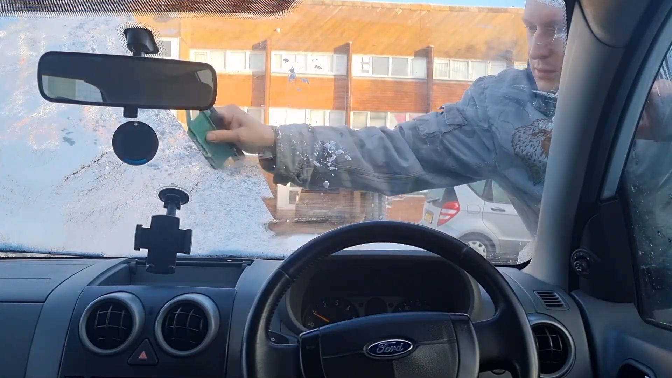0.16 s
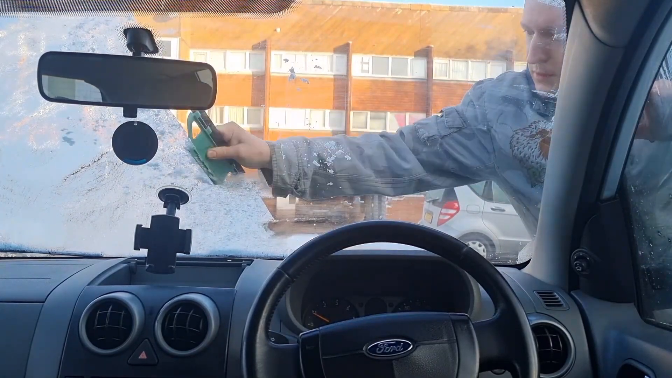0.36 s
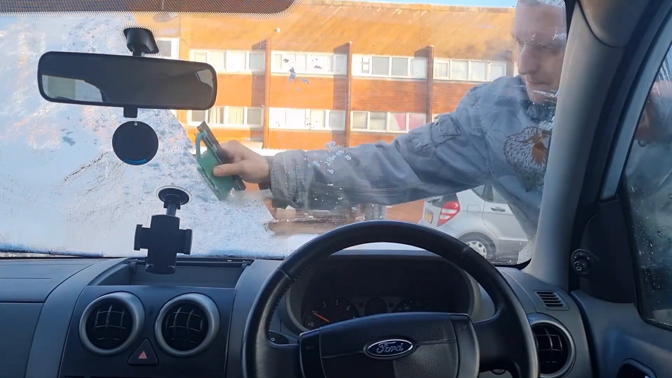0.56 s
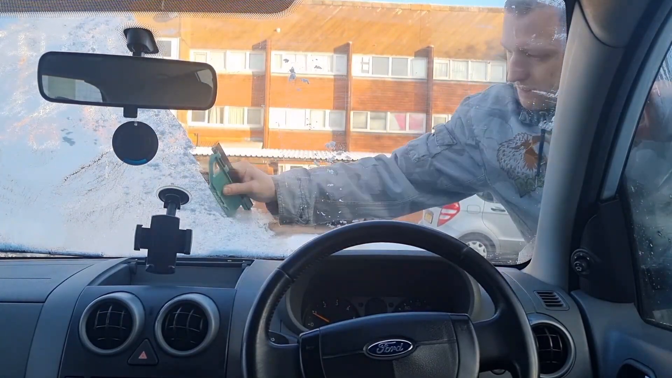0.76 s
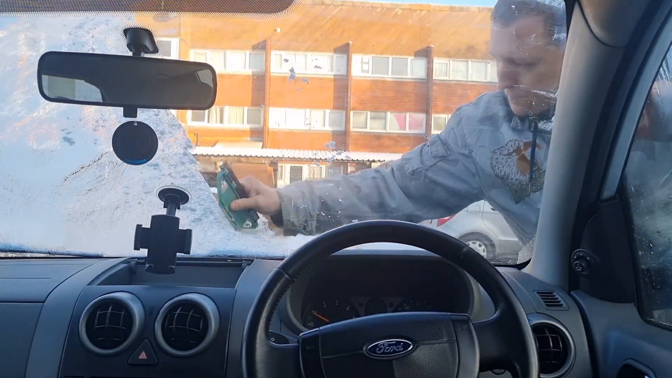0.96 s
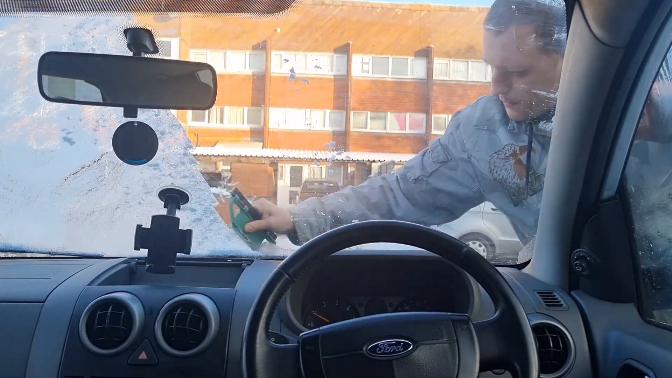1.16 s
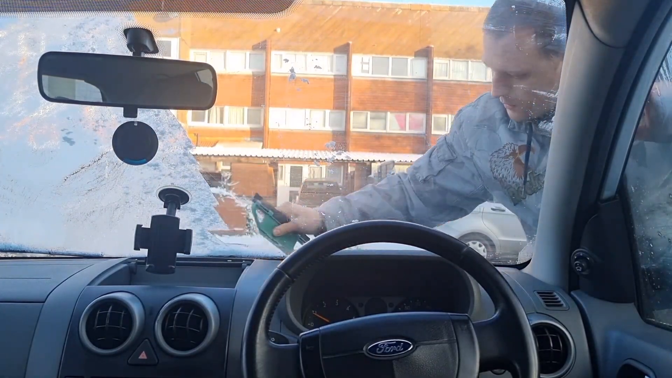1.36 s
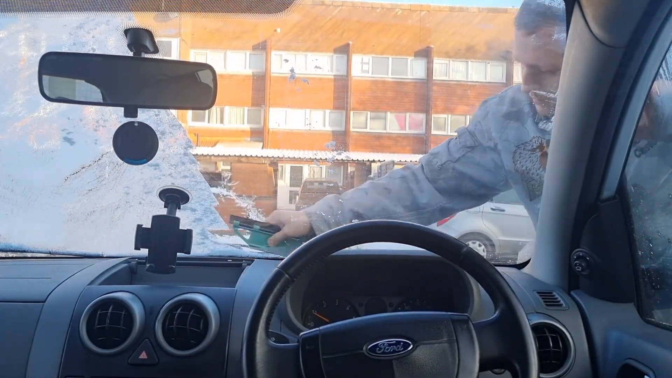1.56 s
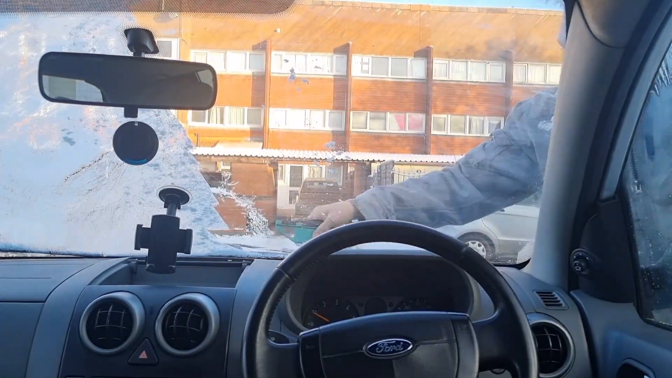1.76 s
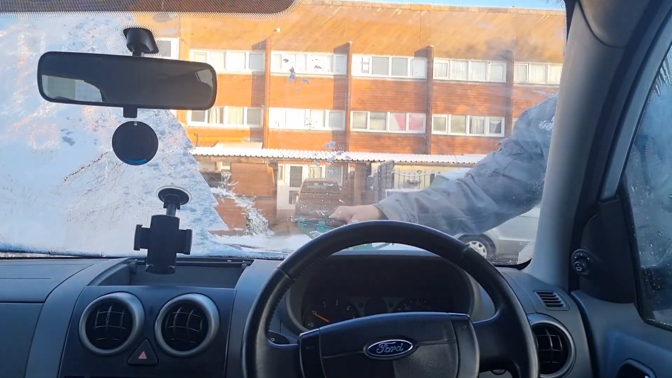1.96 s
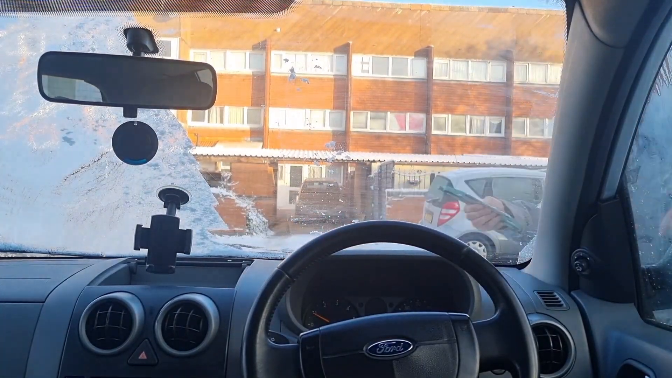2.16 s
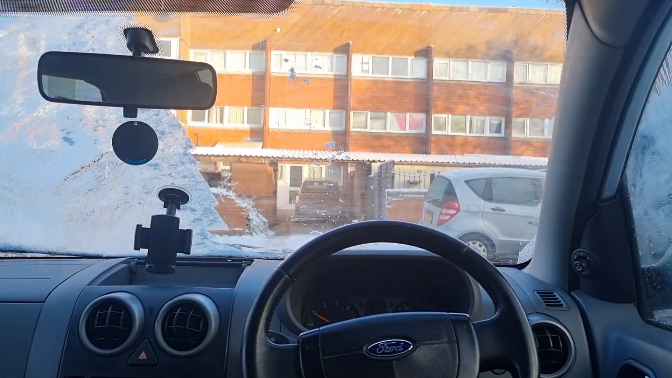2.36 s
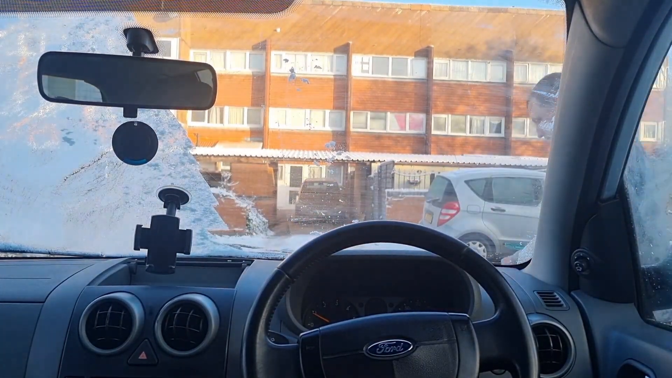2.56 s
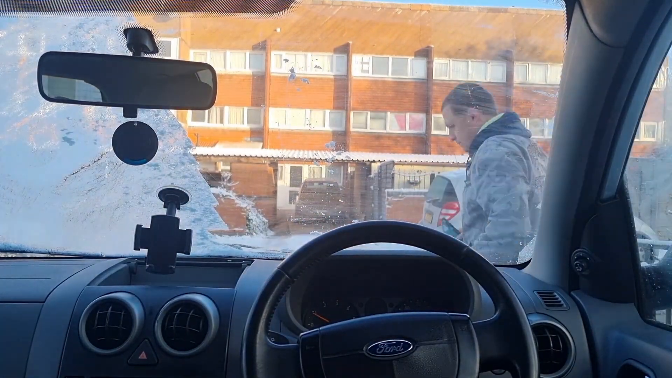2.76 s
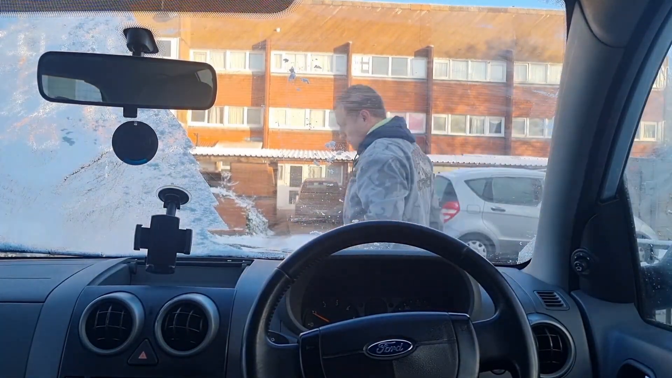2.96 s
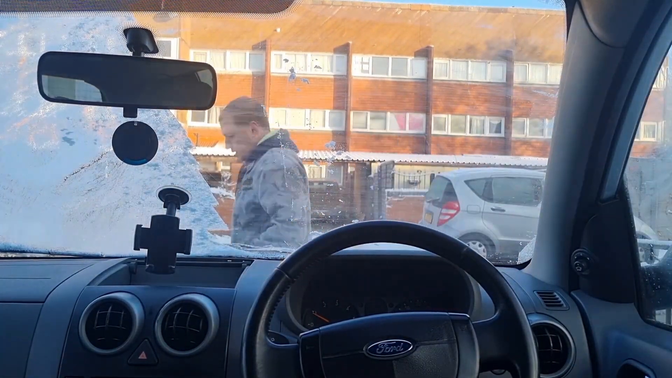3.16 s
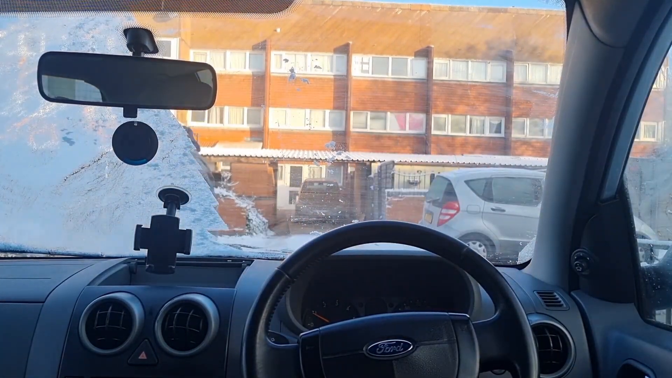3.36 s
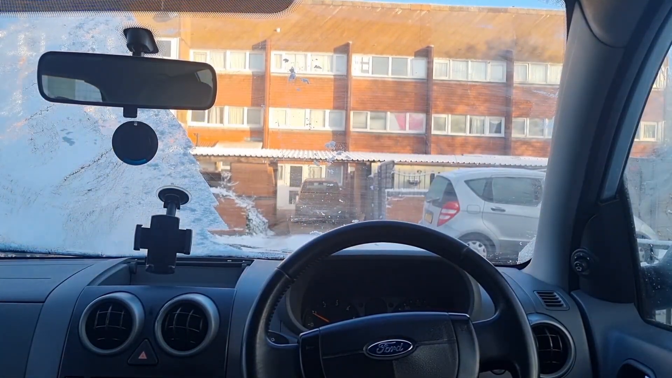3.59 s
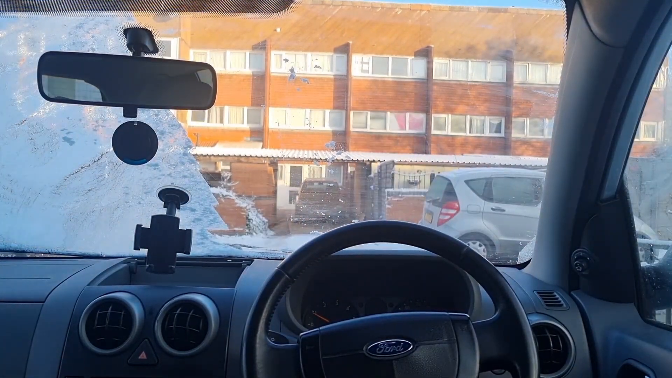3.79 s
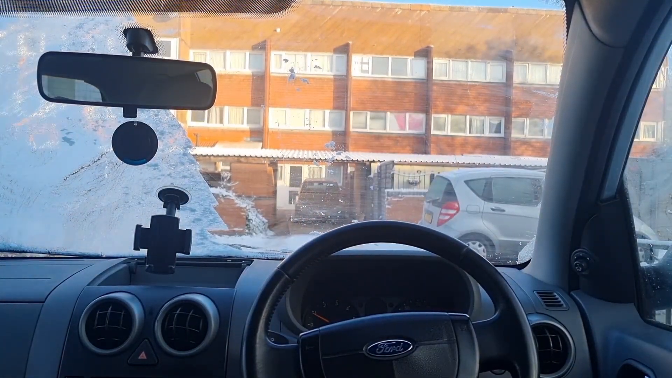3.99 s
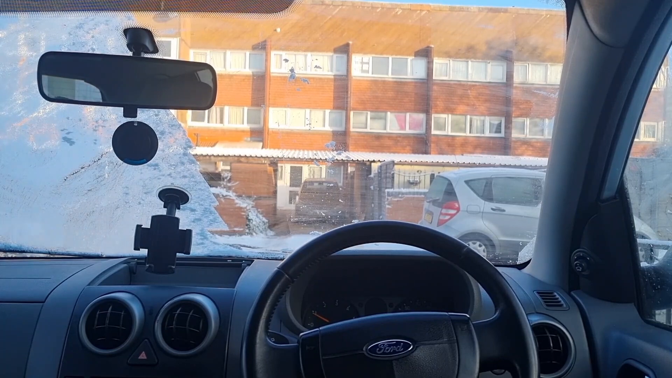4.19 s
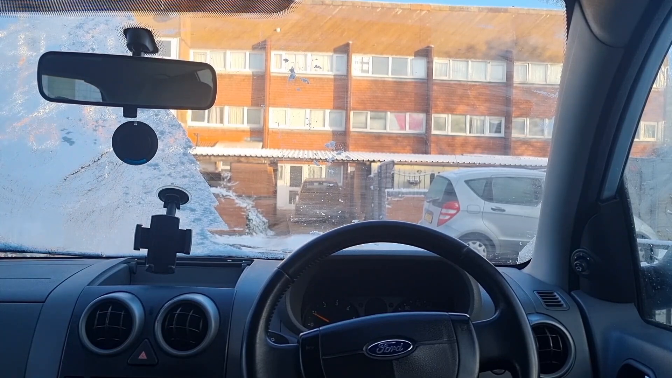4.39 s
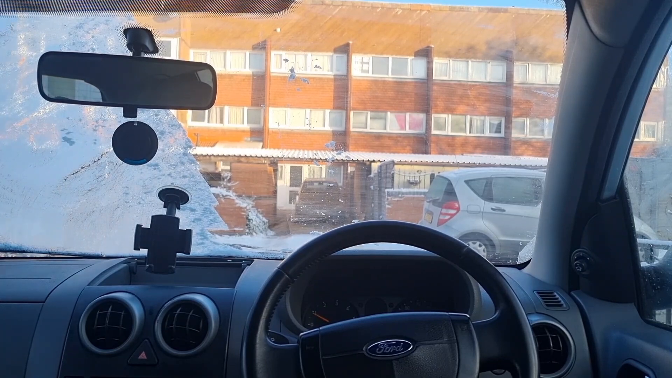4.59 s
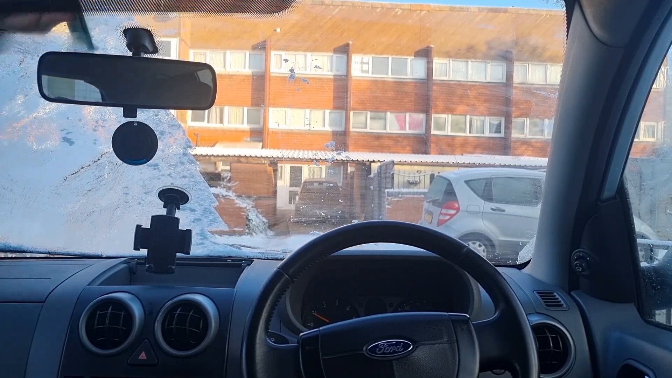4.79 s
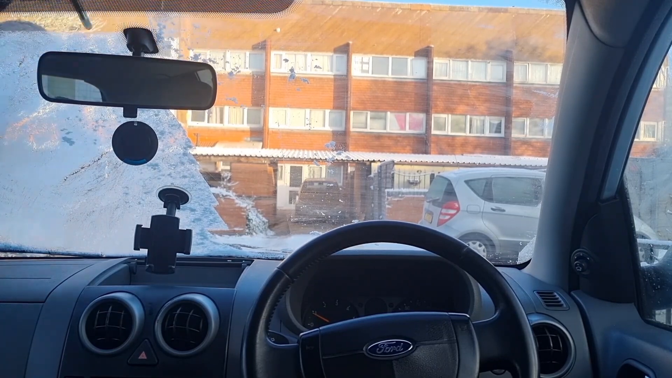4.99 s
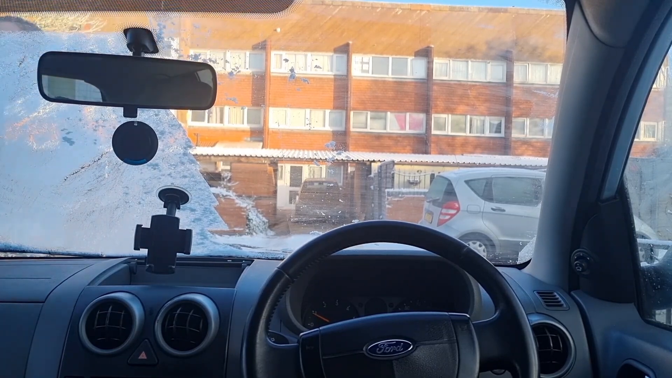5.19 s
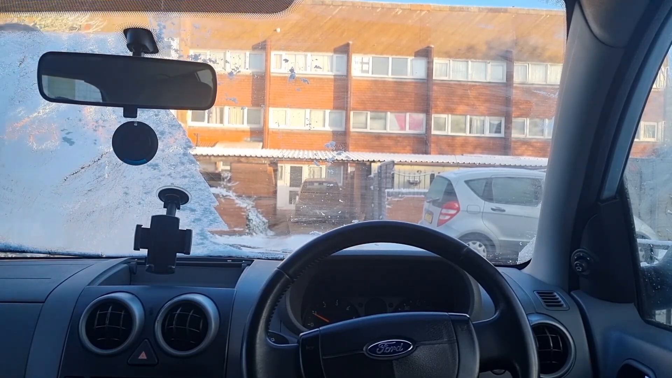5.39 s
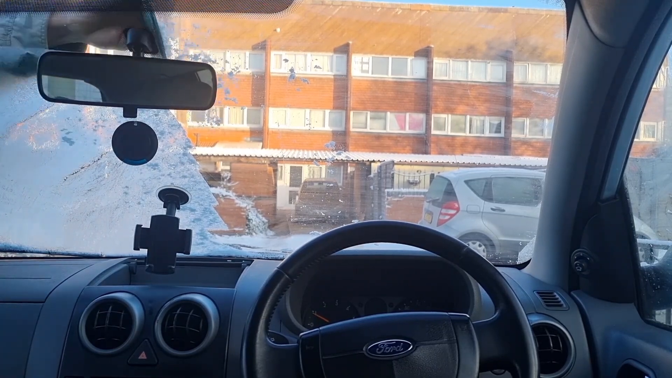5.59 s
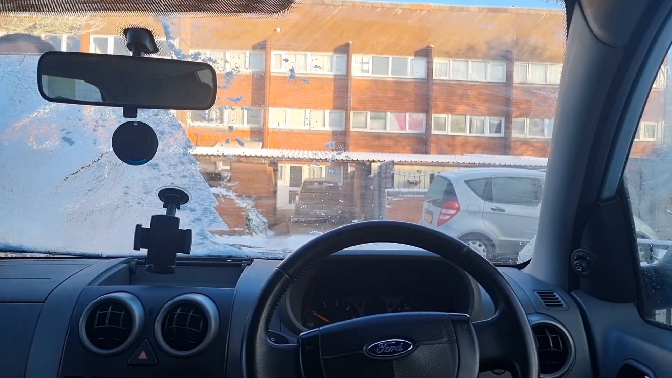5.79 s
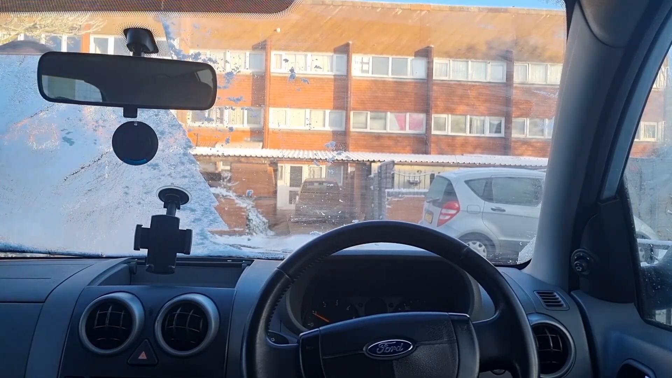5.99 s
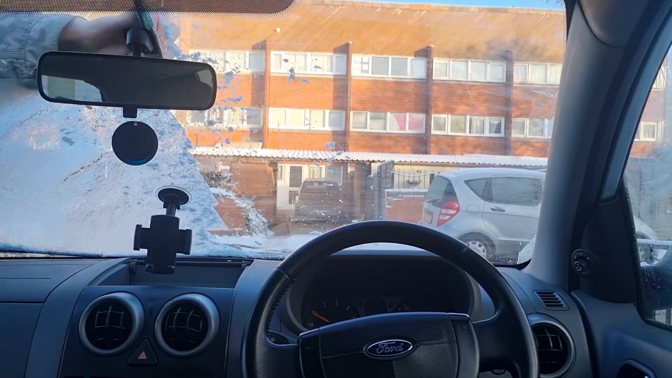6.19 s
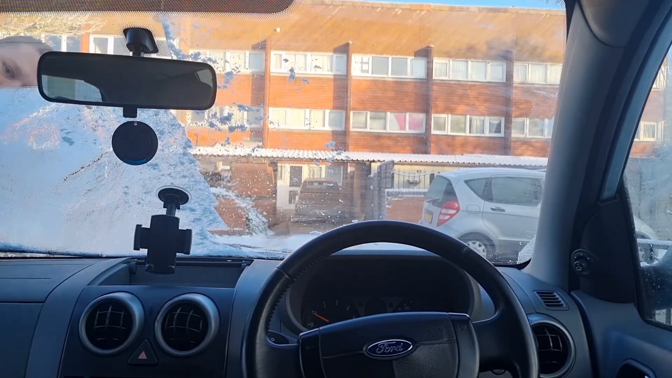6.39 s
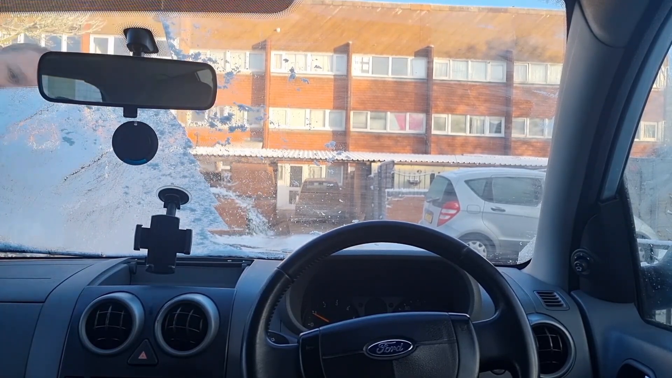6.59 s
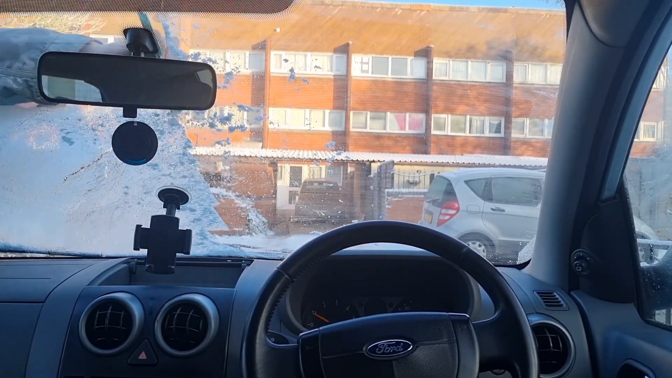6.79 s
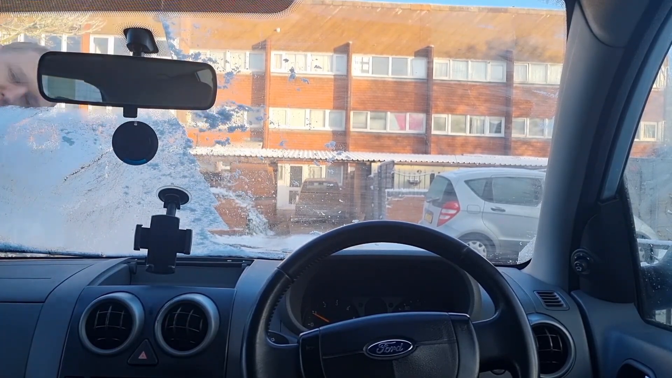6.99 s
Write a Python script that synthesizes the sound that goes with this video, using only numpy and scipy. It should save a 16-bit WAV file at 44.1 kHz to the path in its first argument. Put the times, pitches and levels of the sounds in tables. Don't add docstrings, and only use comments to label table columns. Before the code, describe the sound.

Inside a parked car, a low engine idle hums and wavers throughout, with soft cabin rumble and barely audible hiss. From 0 to 1.6 s a plastic blade scrapes windscreen frost in eight quick cycles, about five a second: strong gritty push, weaker pull, softer around 0.4 to 0.7 s, firm again after. Small ice snaps and low body thuds are mixed in. From 1.6 to 2.3 s come irregular short flicks, with a clustered knock at 2.13 s. Then only the hum until a faint tap at 4.4 s and a clearer set-down at 4.5 s. A slow, dull push runs 4.65 to 5.15 s, with an ice crack near 4.95. Pulls with a deep thud and squeaks follow at 5.2 to 5.5 s, then longer, brighter pushes at 5.6, 6.2 and 6.8 s alternate with rising pulls. A sharp crack and knock land at 5.7 s; the strong last push ends around 7 s.

```python
import sys
import numpy as np
from scipy import signal
from scipy.fft import rfft, irfft, next_fast_len
from scipy.io import wavfile
from scipy.ndimage import uniform_filter1d, map_coordinates

SR = 44100
rng = np.random.default_rng(int(sys.argv[2]) if len(sys.argv) > 2 else 0)


def linear_from_db(decibels):
    return 10 ** (np.asarray(decibels, float) / 20)


def to_wav(sig):
    pcm = np.clip(np.atleast_2d(sig), -1, 1) * 32767
    pcm = np.round(pcm).astype(np.int16)
    wavfile.write(sys.argv[1], SR, pcm.T)


N = 310905

# frequency in Hz, density in dB per Hz.
DRONE_SPECTRUM = [(300, -11), (550, -7.5), (730, 0), (900, -7), (1200, -3.5), (1400, -5), (1600, -9),
                  (1900, -16)]
FROST_SPECTRUM = [(1300, -31), (1750, -7.5), (2050, -5.5), (2300, -1.5), (2480, -2), (2700, -1.5),
                  (2950, -2.5), (3200, -3), (3500, -4.5), (3780, -7), (4600, -12), (6000, -23)]
CRISP_SPECTRUM = [(2800, -28), (3900, -2.5), (5500, -2.5), (7500, -10), (9000, -22), (10000, -41)]
FIZZ_SPECTRUM = [(6500, -37.5), (8800, -4.5), (10500, -4.5), (13300, -3.5), (15800, -4)]

# push start in s, push end in s, pull end in s, push level in dB, pull level in dB.
QUICK_CYCLES = [
    (0.039, 0.095, 0.17, -36.5, -44),
    (0.213, 0.267, 0.34, -38, -47),
    (0.389, 0.455, 0.52, -41, -48.5),
    (0.583, 0.649, 0.72, -40.5, -45.5),
    (0.776, 0.842, 0.92, -36, -41.5),
    (0.981, 1.047, 1.132, -35, -46.5),
    (1.195, 1.271, 1.335, -36.5, -42.5),
    (1.42, 1.495, 1.588, -35.5, -47.5),
]
# start in s, end in s, level in dB, fizz relative level in dB.
SINGLE_STROKES = [(1.641, 1.726, -41.5, -20), (1.744, 1.82, -55, -25), (1.822, 1.902, -45.5, -23.5),
                  (1.922, 1.963, -50, -25), (2.023, 2.051, -38, -19.5), (2.095, 2.13, -48, -19),
                  (2.149, 2.19, -53, -18.5), (2.234, 2.269, -41, -19), (2.297, 2.314, -55.5, -17),
                  (5.22, 5.408, -43.5, -22.5), (5.403, 5.497, -48, -21), (5.507, 5.545, -38, -23),
                  (5.947, 6.192, -43.5, -18.5), (6.546, 6.798, -40, -19)]
# start in s, end in s, level in dB, fizz relative level in dB.
IDLE_TOUCHES = [
    (4.408, 4.422, -69, -49),
    (4.499, 4.537, -47, -36.5),
    (4.55, 4.596, -61, -36),
    (5.13, 5.209, -57.5, -24),
]
# start in s, dig-in in s, end in s, level once dug in in dB, fizz relative level in dB.
LONG_PUSHES = [
    (4.644, 4.86, 5.15, -39.5, -22),
    (5.56, 5.664, 5.871, -39.5, -15.5),
    (6.202, 6.294, 6.472, -36, -18),
    (6.82, 6.892, 7.059, -35, -17),
]

# time in s, peak level in dB, centre frequency in Hz.
JAMS = [
    (0.051, -31, 2620),
    (.81, -40, 3400),
    (1.015, -34.5, 2970),
    (1.46, -40, 2800),
    (2.043, -44, 2900),
    (6.317, -33.5, 2280),
    (6.916, -33, 3280),
]
SNAPS = [(0.238, -33.5, 1860), (1.248, -38.5, 900), (1.255, -38, 350), (2.13, -39.5, 900),
         (4.885, -39, 1500), (4.951, -32.5, 1500), (5.285, -43, 2180), (5.349, -40, 1810),
         (5.385, -42, 1420), (5.696, -30.5, 2490), (6.32, -37, 3680), (6.327, -35.5, 503)]
SQUEAKS = [
    (5.235, -47, 1100),
    (5.286, -37.5, 1170),
    (5.607, -40.5, 2200),
    (6.081, -42, 727),
    (6.398, -43, 1280),
    (6.75, -42, 1320),
    (6.863, -54, 1260),
    (.893, -49, 740),
]
KNOCKS = [
    (2.126, -31, 392),
    (2.134, -29.5, 407),
    (2.134, -31, 648),
    (2.141, -31.5, 221),
    (2.165, -41.5, 300),
    (4.5, -37.5, 745),
    (5.697, -32.5, 1030),
    (5.704, -34.5, 560),
    (5.708, -32.5, 196),
]
THUDS = [
    (0.261, -31, 90.5),
    (.57, -39.5, 168),
    (0.97, -38.5, 168),
    (1.05, -37, 105),
    (1.273, -36, 110),
    (1.5, -35.5, 105),
    (2.25, -40, 166),
    (5.236, -31, 67),
    (5.39, -36.5, 167),
]

# multiple of firing rate, rms level in dB, wander in Hz, flutter in dB.
ENGINE_ORDERS = [(1.014, -41, 0.71, 1.2), (2.12, -34.5, 2.216, 0.96), (3.97, -55.5, 3, 4),
                 (5.03, -60, 2.87, 2), (5.92, -56, 2.994, 3.5), (7.91, -52, 3.935, 3),
                 (11.86, -51, 4.99, 3), (64.9, -72.5, 15, 5.5)]
# frequency in Hz, density in dB per Hz.
CABIN_SPECTRUM = [(3, -21.5), (40, -16), (65, -5.5), (95, -17), (200, -18.5), (260, -25), (345, -20.5),
                  (400, -23.5), (650, -30), (1340, -44), (1900, -44.5), (2680, -58.5), (3150, -53),
                  (4050, -60.5), (4400, -76)]
# frequency in Hz, density in dB per Hz.
HISS_SPECTRUM = [(3000, -19), (4800, 0), (7000, -15.5), (10000, -17), (13000, -14.5), (16500, -21.5)]
# frequency in Hz, left minus right in dB.
LEAN_DB = [(60, 1), (200, -4.5), (400, 0), (1300, -0.5), (2400, 2), (4400, -1.5), (15000, 1.5)]

TURN_S = 0.02
PUSH_GAINS_DB, PULL_GAINS_DB, PUSH_FIZZ_DB, PULL_FIZZ_DB = 2, 7, -19.5, -17.5
SINGLE_GAINS_DB, TOUCH_GAINS_DB = 4.5, -6.5
RUN_UP_DB, RUN_UP_GAINS_DB, RUN_UP_DULLER_DB = -3, 9, -4.5
REACH_S, FADE_DB_PER_S = 0.13, -50
DRONE_DB, DRONE_PER_FIZZ = -5.5, -0.4
FIRING_HZ = 28.65
TOP_HZ = 15800


def unit(x):
    return x / np.sqrt(np.mean(x ** 2, axis=-1, keepdims=True) + 1e-20)


def along(points, hz):
    f, v = np.transpose(points)
    return np.interp(np.log(hz + 1), np.log(f + 1), v, left=-120, right=-120)


def wobble(rate_hz):
    at = np.arange(0, N + 8, 8)
    knots = rng.standard_normal(int(N * rate_hz / SR) + 4)
    return np.interp(np.arange(N), at, map_coordinates(knots, [at * rate_hz / SR]))


def filtered(x, response):
    m = next_fast_len(x.shape[-1] + 8192)
    spectrum = rfft(x, m) * response(np.fft.rfftfreq(m, 1 / SR))
    return irfft(spectrum, m)[..., :x.shape[-1]]


def patchy(x, patchy_db, wide, long, size=256):
    z = signal.stft(x, nperseg=size)[2]
    field = rng.standard_normal(z.shape[1:])
    field = uniform_filter1d(field, int(wide), axis=0)
    field = uniform_filter1d(field, int(long), axis=1)
    return signal.istft(z * linear_from_db(patchy_db * field / field.std()), nperseg=size)[1][:, :N]


def scraper():
    fizz_db = np.transpose(strokes())[-1]
    drone_db = DRONE_DB + DRONE_PER_FIZZ * (fizz_db + 20)
    crisp_db = -6.0 + 0.5 * (fizz_db + 19.0)
    bite_db = 0.55 * wobble(28) + 0.8 * wobble(110)
    drone = under_strokes(drone_db + 0.11, 0.0055, 0.01, late_s=0.0011, linger_db=-30)
    frost = under_strokes(0 * fizz_db - 1.5, 0.0045, 0.005, late_s=0.0005, linger_db=-18)
    crisp = under_strokes(crisp_db, 0.0022, 0.005, late_s=0.002, linger_db=-38)
    fizz = under_strokes(fizz_db + 0.3, 0.0012, 0.004, late_s=0.0035, linger_db=-52)
    return (drone * linear_from_db(1.2 * bite_db) * grit(DRONE_SPECTRUM, 0.57, patchy_db=1.5, modes_db=4.5)
            + frost * linear_from_db(bite_db) * grit(FROST_SPECTRUM, 0.77, patchy_db=1.6, modes_db=3.5)
            + crisp * linear_from_db(1.1 * bite_db) * grit(CRISP_SPECTRUM, 0.88, patchy_db=2.6, modes_db=2.5)
            + fizz * linear_from_db(0.56 * bite_db) * grit(FIZZ_SPECTRUM, 1.1, patchy_db=2.0, modes_db=-0.5))


def strokes():
    rows = [(start, end, db, SINGLE_GAINS_DB, fizz) for start, end, db, fizz in SINGLE_STROKES]
    rows += [(start, end, db, TOUCH_GAINS_DB, fizz) for start, end, db, fizz in IDLE_TOUCHES]
    for start, turn, end, push_db, pull_db in QUICK_CYCLES:
        rows.append((start, turn, push_db, PUSH_GAINS_DB, PUSH_FIZZ_DB))
        rows.append((turn + TURN_S, end, pull_db, PULL_GAINS_DB, PULL_FIZZ_DB))
    for start, dig, end, db, fizz in LONG_PUSHES:
        rows.append((start, dig, db + RUN_UP_DB, RUN_UP_GAINS_DB, fizz + RUN_UP_DULLER_DB))
        rows.append((dig, end, db, FADE_DB_PER_S * (end - dig - REACH_S), fizz))
    return sorted(rows)


def under_strokes(column_db, rise_s, fall_s, late_s, linger_db):
    power, t, rest = np.zeros(N), np.arange(N) / SR, -1
    step = lambda x, edge_s: 1 / (1 + np.exp(-x / edge_s))
    for (start, end, db, gain_db, _), rel_db in zip(strokes(), column_db):
        near = slice(max(int((start - 0.07) * SR), 0), int((end + 0.07) * SR))
        since = t[near] - start - late_s * (start - rest > 0.012)
        left = end - t[near]
        progress = np.clip((t[near] - start) / max(end - start, 0.005), 0, 1)
        ramp = step(since, rise_s) * step(left, fall_s)
        ramp = ramp + linear_from_db(linger_db) * step(since, 0.031) * step(left, 0.038)
        power[near] += (linear_from_db(db + rel_db + gain_db * (progress - 0.5)) * ramp) ** 2
        rest = end
    return np.sqrt(power)


def grit(spectrum, grain_db, patchy_db, modes_db):
    clumps = linear_from_db(grain_db * wobble(900))
    cracks = patchy(clumps * rng.standard_normal((2, N)), patchy_db, wide=4.3, long=9)
    cracks = patchy(cracks, modes_db, wide=2.5, long=3.5, size=2048)
    return unit(filtered(cracks, lambda hz: linear_from_db(along(spectrum, hz))))


def crunches():
    out = np.zeros((2, N + SR))
    for rows, octaves, length_s in ((JAMS, 0.28, 0.0086), (SNAPS, 1.3, 0.0052), (SQUEAKS, 0.15, 0.01),
                                    (KNOCKS, 0.38, 0.0057), (THUDS, 0.45, 0.02)):
        for at_s, db, hz in rows:
            start = round(at_s * SR)
            out[:, start:start + 4096] += linear_from_db(db) * blow(hz, octaves, length_s)
    return out[:, 2048:N + 2048]


def blow(centre_hz, octaves, length_s):
    t = np.arange(-2048, 2048) / SR
    burst = rng.standard_normal((2, len(t)))
    burst[[0, 1], 2048 + rng.integers(-40, 40, size=2)] += 0.9 * np.sqrt(length_s * SR)
    band = lambda f: np.exp(-(np.log2((f + 1) / centre_hz) / octaves) ** 2) / np.sqrt(f + 1)
    swell = np.exp(-0.5 * (t / length_s) ** 2)
    ring = swell * filtered(burst, band)
    return ring * np.sqrt(np.sum(swell ** 2) / np.sum(ring ** 2, axis=1, keepdims=True))


def engine():
    out = np.zeros((2, N))
    for multiple, db, wander_hz, flutter_db in ENGINE_ORDERS:
        for side, offset in zip(out, (1.011, 0.989)):
            detune = offset ** (2 < multiple < 3)
            hz = multiple * FIRING_HZ * detune + wander_hz * (wobble(7.5) + 1.204 * wobble(24))
            level = linear_from_db(db + flutter_db * wobble(16)) * np.sqrt(2)
            side += level * np.sin(2 * np.pi * (np.cumsum(hz) / SR + rng.random()))
    return out


def cabin():
    rumble = patchy(rng.standard_normal((2, N)), patchy_db=2.13, wide=2.3, long=12)
    rumble = filtered(rumble, lambda hz: linear_from_db(along(CABIN_SPECTRUM, hz)))
    hiss = filtered(rng.standard_normal((2, N)), lambda hz: linear_from_db(along(HISS_SPECTRUM, hz)))
    return linear_from_db(-39) * unit(rumble) + linear_from_db(-85.0) * unit(hiss)


def scene():
    return scraper() + crunches() + engine() + cabin()


def top_cut(x):
    return signal.sosfilt(signal.butter(12, 15990, fs=SR, output="sos"), x)


def record(dry):
    sides = np.array([[0.5], [-0.5]])
    lean = lambda hz: linear_from_db(along(LEAN_DB, np.clip(hz, 70, 14000)) * sides) * (hz < TOP_HZ)
    return top_cut(filtered(dry, lean))


dry = scene()
out = record(dry)
to_wav(out)
```